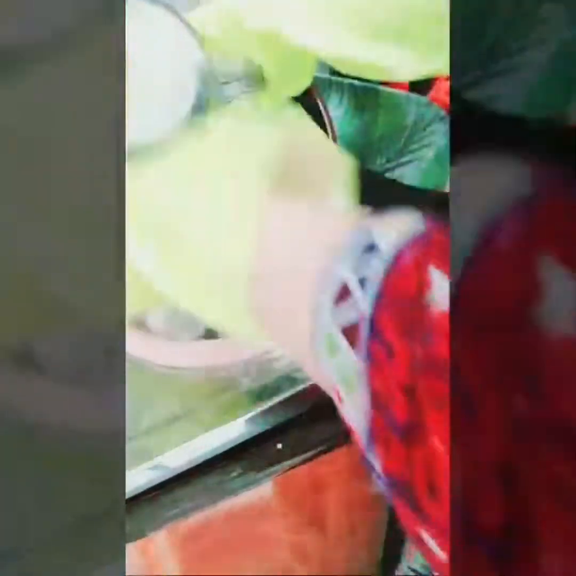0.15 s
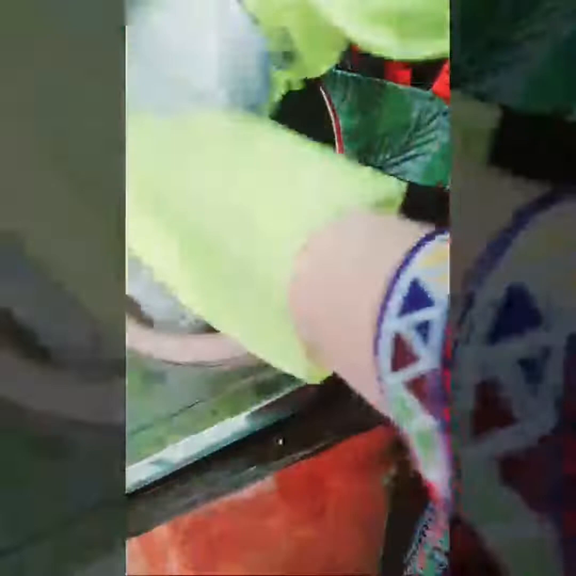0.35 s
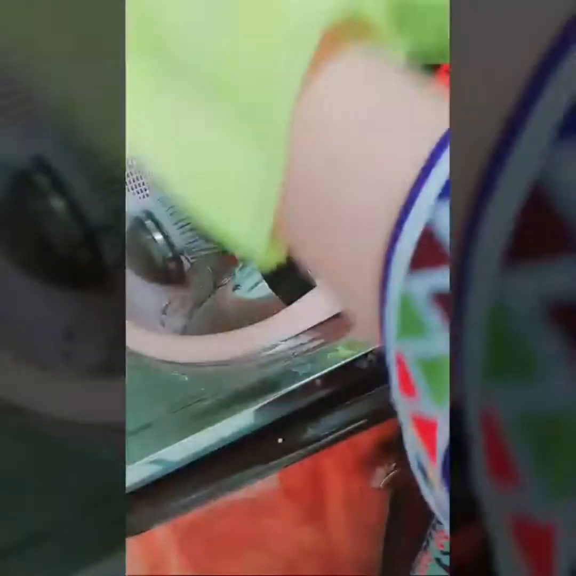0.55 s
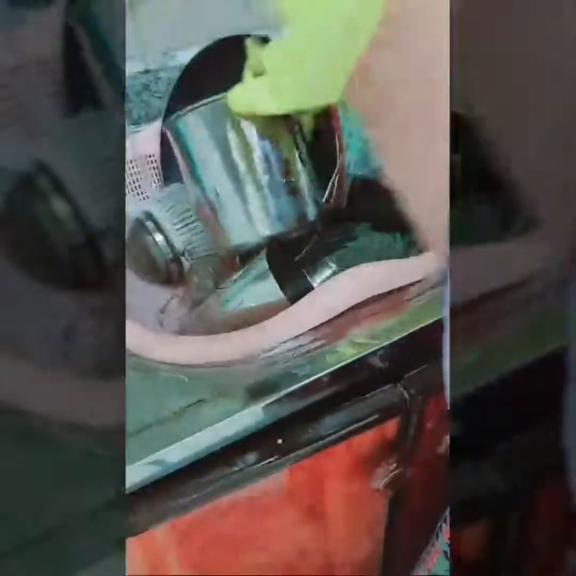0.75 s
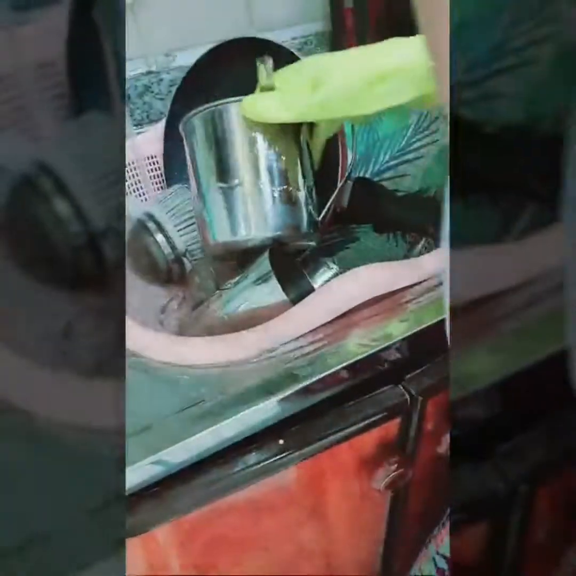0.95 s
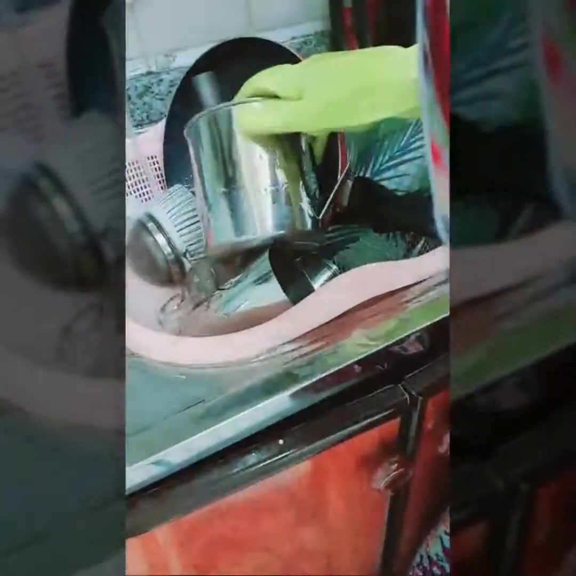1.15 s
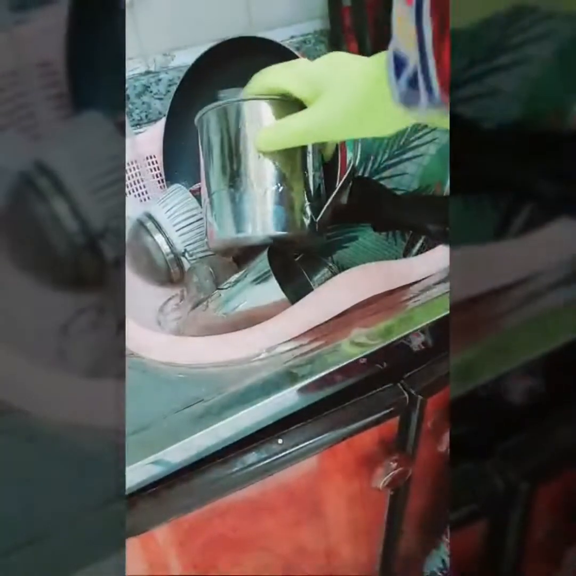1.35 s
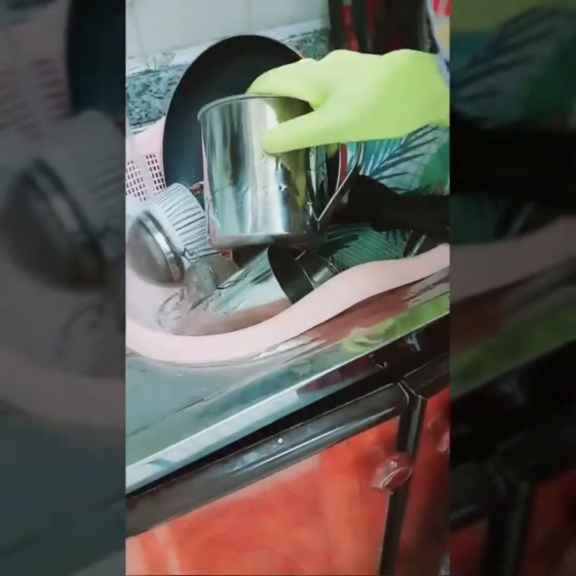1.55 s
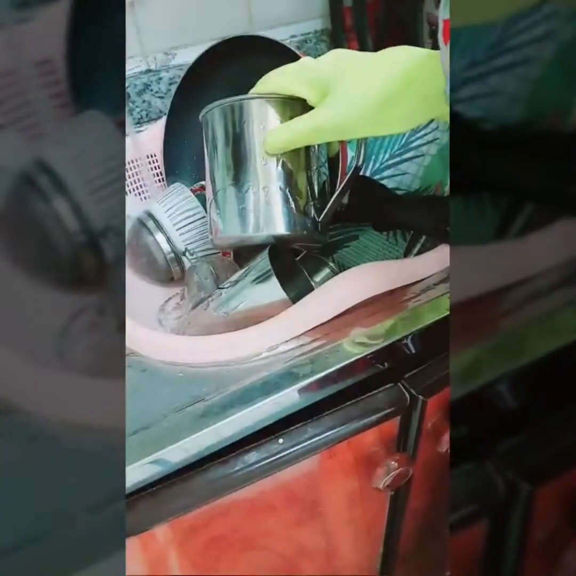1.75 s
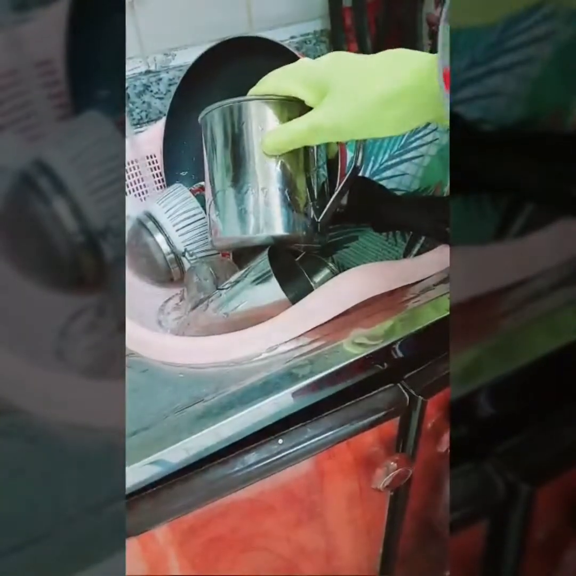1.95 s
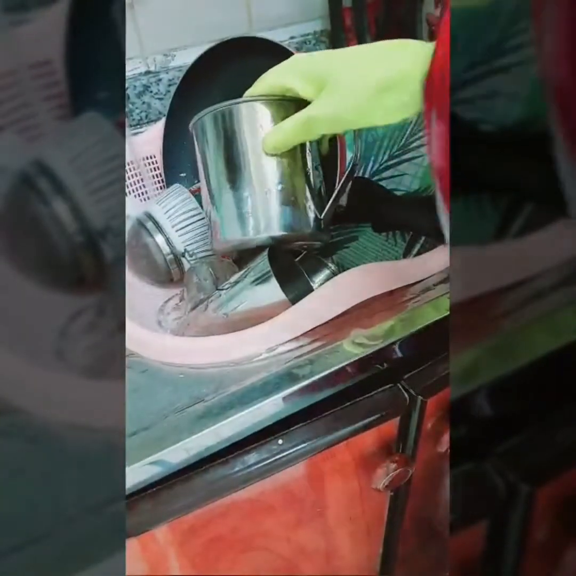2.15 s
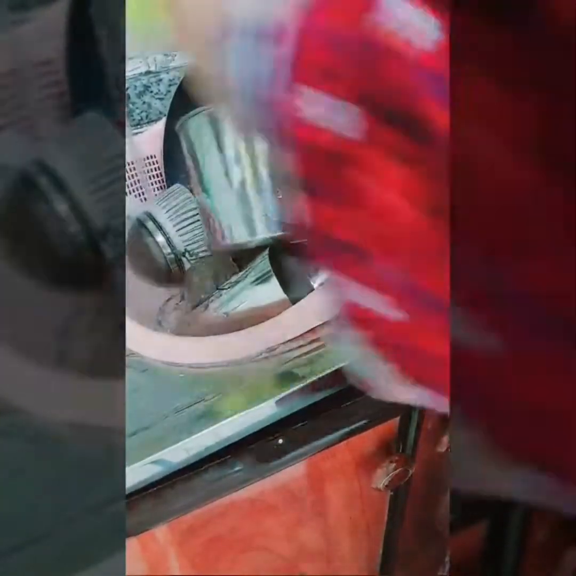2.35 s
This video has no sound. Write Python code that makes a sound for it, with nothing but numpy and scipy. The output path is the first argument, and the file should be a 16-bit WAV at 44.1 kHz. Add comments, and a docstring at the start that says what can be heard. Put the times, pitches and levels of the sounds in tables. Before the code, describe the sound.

Steel dishes clatter in a metal sink, close to a phone. Soft knocks from 0.1 seconds lead to the loudest, boomy clank at 0.4 with bright cup clinks; another bump and bowl clink follow at 0.6 to 0.7. After a lull, a mug scrapes and rings at 1.1 to 1.5. Duller knocks come at 1.6, 1.75 and 2.0 to 2.3, over faint room hum and hiss.

```python
"""A low room hum and hiss, then steel dishes bumping a steel sink, shifted by gloved hands near a phone.
Each bump booms in the basin's modes under a crowded knock and a clatter of ticks and hiss.
A mug drags over the pile: stick-slip clicks ring its walls and rasp on the steel.
A cup, a bowl and the mug clink as sums of dying modes.
The small kitchen answers with a tail of sparse taps; the hum and hiss are drifting shaped noise."""
import sys
import numpy as np
from scipy import signal
from scipy.fft import rfft, irfft, next_fast_len
from scipy.io import wavfile
from scipy.ndimage import uniform_filter1d

SR = 44100
rng = np.random.default_rng(int(sys.argv[2]) if len(sys.argv) > 2 else 0)


def pcm_store(signal):
    """Save signal as 16-bit PCM."""
    levels = np.round(np.clip(np.atleast_2d(signal), -1, 1) * 32767)
    wavfile.write(sys.argv[1], SR, levels.astype(np.int16).T)


def convert_level_to_amplitude(level_db):
    """Map a level in decibels to its linear amplitude factor."""
    exponent = np.asarray(level_db, float) / 20
    return 10 ** exponent


N = 103635  # length [samples]


def evened(x):
    """Scales to rms 1."""
    return x / np.sqrt(np.mean(x ** 2) + 1e-20)


def read(points, hz):
    """Reads a table on a log-frequency axis."""
    f, value = np.transpose(points)
    return np.interp(np.log(hz + 1), np.log(f + 1), value)


def add(mix, s, sound):
    """Adds a sound at time s, cut off where the mix ends."""
    part = mix[round(s * SR):][:len(sound)]
    part += sound[:len(part)]


def colour(x, points):
    """Gives noise or grains a spectrum, at rms 1."""
    size = next_fast_len(len(x))
    gain = convert_level_to_amplitude(read(points, np.fft.rfftfreq(size, 1 / SR)))
    return evened(irfft(rfft(x, size) * gain, size)[:len(x)])


def grains(per_s, spread_db):
    """Sparse clicks of random sign, a few of them large, at rms 1."""
    chance, size, sign = rng.random(N), rng.exponential(1, N), rng.choice([-1., 1.], N)
    return evened((chance < per_s / SR) * sign * convert_level_to_amplitude(spread_db * np.minimum(size, 4)))


def ring(modes, weights, rise_s):
    """One second of dying modes, swelling in with time constant rise_s."""
    t = np.arange(SR) / SR
    hz, db, t60 = np.transpose(modes)[:, :, None]
    tones = weights * convert_level_to_amplitude(db - 60 * t / t60) * np.sin(2 * np.pi * hz * t)
    return tones.sum(0) * (1 - np.exp(-t / rise_s))


def resonate(x, hz, width):
    """A fixed resonance, at rms 1."""
    r = np.exp(-np.pi * width / SR)
    return evened(signal.lfilter([1, 0, -1], [1, -2 * r * np.cos(2 * np.pi * hz / SR), r * r], x))


def crowd(points, t60, count):
    """Very many modes of random pitch and life around t60, shaped by a spectrum; energy 1."""
    lo, hi = np.log(points[1][0]), np.log(points[-1][0])
    place, size, life, turn = rng.random((count, 4)).T[:, :, None]
    hz, t = np.exp(lo + (hi - lo) * place ** .7), np.arange(SR // 4) / SR
    db = read(points, hz) + 5 * np.log10(hz) + 8 * size
    fade = convert_level_to_amplitude(db - 60 * t / (t60 * (0.14 + 1.54 * life)))
    body = (fade * np.sin(2 * np.pi * (hz * t + turn))).sum(0)
    return body / np.linalg.norm(body)


# dishes bumping the basin:
# (time [s], boom level [dB], knock level [dB], clatter level [dB], contact length [s])
BUMPS = [(0.125, -32.5, -11, -32, 0.066), (.205, -36, -3, -24.5, 0.012), (0.22, -29, -1.5, -32, 0.044),
         (0.305, -29.5, 2.5, -35.5, 0.049), (0.403, -8, 12, -13, 0.011), (0.436, -46, -7, -30, 0.041),
         (0.61, -19.5, 8, -19.5, 0.022), (0.675, -49, -14, -32, 0.031), (1.566, -29.5, -2, -61, 0.039),
         (1.752, -16.5, 5.5, -30.5, 0.017), (1.808, -51, -31, -41, 0.045), (2.009, -18, 5.5, -29, 0.017),
         (2.046, -20, 2.5, -42.5, 0.031), (2.124, -25.5, -13, -40.5, 0.013),
         (2.159, -28.5, -3, -36.5, 0.033), (2.198, -32, -5.5, -45, 0.013), (2.275, -49, -21, -42.5, 0.071)]
# low modes of the basin: (frequency [Hz], level [dB], t60 [s])
BASIN_MODES = [(81, 2, 0.17), (120, 7, 0.077), (160.3, 3.5, 0.051), (262.3, -10, 0.34)]
# crowded upper modes of the basin: (frequency [Hz], level per Hz [dB])
KNOCK_SPECTRUM = [(150, -29), (280, -1), (520, -1.5), (1050, -11), (2270, -18), (4500, -54)]


def basin():
    """Each bump is a first blow and smaller jolts while contact lasts; chance sets how each mode answers."""
    knock_t60, rise_s, jolts_per_s = 0.088, 0.003, 120  # typical t60 and mean rate
    out, t = np.zeros(N), np.arange(SR // 4) / SR
    chances = rng.random((len(BUMPS), 3, 8))
    for (s, boom_db, knock_db, _, length), (when, size, share) in zip(BUMPS, chances):
        weights = 0.84 + 0.15 * share[:len(BASIN_MODES), None]
        blow = convert_level_to_amplitude(boom_db) * ring(BASIN_MODES, weights, rise_s)[:SR // 2]
        knock = crowd(KNOCK_SPECTRUM, knock_t60, count=160)
        add(blow, 0, convert_level_to_amplitude(knock_db) * knock * np.minimum(t / rise_s, 1))
        at = np.r_[0, np.cumsum((.6 + .8 * when) / jolts_per_s)]
        touching = at[1:] < length
        sign = (-1) ** (when > .5)
        jolts = np.zeros(SR // 8)
        jolts[(at * SR).astype(int)] = np.r_[1, (.4 + .3 * size) * touching * sign]
        add(out, s, signal.oaconvolve(blow, jolts))
    return out


# clatter of the pile: (frequency [Hz], level per Hz [dB])
CLATTER_SPECTRUM = [(150, -58), (400, -2), (3970, -4), (7600, -9.5), (8900, -20), (10500, -18),
                    (12100, -10.5), (13200, -34)]
PILE_T60 = 0.12  # typical ring of the pile [s]


def clatter():
    """While contact lasts, ticks ring the many modes of the pile over a short hiss."""
    ticks_per_s, rise_s, fall_t60, hiss_share = 1000, 0.0016, 0.046, 0.84
    out, t = np.zeros(N), np.arange(SR // 4) / SR
    ticks = grains(ticks_per_s, 5.6)
    hiss = colour(rng.standard_normal(N), CLATTER_SPECTRUM)
    for s, _, _, db, length in BUMPS:
        at = round(s * SR)
        fall = convert_level_to_amplitude(db - 60 * np.maximum(t - length, 0) / fall_t60)
        level = (fall * np.minimum(t / rise_s, 1))[:N - at]
        part = slice(at, at + len(level))
        burst = level * ticks[part]
        burst = np.linalg.norm(level) * burst / np.linalg.norm(burst)  # energy free of the tick count
        add(out, s, signal.oaconvolve(burst, crowd(CLATTER_SPECTRUM, PILE_T60, count=80)))
        add(out, s, hiss_share * level * hiss[part])
    return out


# modes of the mug, the first its low hum: (frequency [Hz], width [Hz], level [dB])
MUG_MODES = [(519.1, 13.5, 0), (1658, 14, -6.5), (2433, 22, -7), (2784, 56, -6.5), (3300, 57, -2),
             (5080, 24, -5), (5470, 60, -4), (7210, 50, -3)]
# path of the drag: (time [s], scrape level [dB], mug wall hum level [dB])
DRAG_PATH = [(1.123, -34.5, -51), (1.184, -32, -32), (1.195, -16.5, -37.5), (1.249, -23, -24),
             (1.28, -27.5, -46), (1.308, -23.5, -23), (1.335, -30.5, -31.5), (1.351, -26.5, -18),
             (1.372, -27.5, -32.5), (1.387, -21.5, -24), (1.432, -25, -47), (1.475, -49, -50),
             (1.754, -39.5, -38)]
# rasp on the steel: (frequency [Hz], level per Hz [dB])
SCRAPE_SPECTRUM = [(410, -39), (700, -19.5), (1690, -11.5), (2240, -16), (3460, -2.5), (13500, -23)]


def drag():
    """Stick-slip clicks ring the mug's walls and rasp on the steel; as the contact slides, other modes answer."""
    slips_per_s, ring_db, rasp_db = 1200, -12.5, -5.5
    flicker_db, flicker_s = 4.5, 0.02  # each mode swells and fades as the contact slides
    s, scrape_db, hum_db = np.transpose(DRAG_PATH)
    t = np.arange(N) / SR
    on = np.clip(np.minimum(t - s[0], s[-1] - t) / 0.0044, 0, 1)
    slips = grains(slips_per_s, 2.67) + 0.44 * rng.standard_normal(N)

    span = round(flicker_s * SR)
    drift = rng.standard_normal((len(MUG_MODES) + 2, N))
    flicker = evened(uniform_filter1d(uniform_filter1d(drift, span), span))
    walls = sum(convert_level_to_amplitude(db + flicker_db * f) * resonate(slips, hz, width)
                for f, (hz, width, db) in zip(flicker, MUG_MODES[1:]))
    pile = sum(signal.oaconvolve(convert_level_to_amplitude(flicker_db * f) * evened(slips),
                                 crowd(SCRAPE_SPECTRUM, PILE_T60, count=50))[:N]
               for f in flicker[-3:]) / 2
    rasp = colour(slips, SCRAPE_SPECTRUM) + pile
    scrape = convert_level_to_amplitude(ring_db) * walls + convert_level_to_amplitude(rasp_db) * rasp

    wall_hum = resonate(slips, *MUG_MODES[0][:2])
    wall_hum /= np.sqrt(uniform_filter1d(wall_hum ** 2, 900) + 0.6)  # evens out its swells
    scrape_level = convert_level_to_amplitude(np.interp(t, s, scrape_db))
    hum_level = convert_level_to_amplitude(np.interp(t, s, hum_db))
    return on * (scrape_level * scrape + hum_level * wall_hum)


# modes of the cup and of the bowl: (frequency [Hz], level [dB], t60 [s])
CUP_MODES = [(2543, -8, 0.16), (2820, -1, 0.23), (3002, 9.5, 0.17), (4540, -9, 0.98), (4858, 12.5, 0.068),
             (5502, 0, 0.13), (7289, 2, 0.25), (7610, 12, 0.089)]
BOWL_MODES = [(1390, -11.5, 4.2), (2406, -3, 0.21), (2951, -3.5, 0.43), (3300, -4, 0.39), (3905, -9, 0.51),
              (4090, -11, .19), (4860, 0, 0.22), (4890, 5.5, 0.17), (5430, 12, 0.14), (5900, 4, 0.2),
              (6300, -1, 0.12), (7170, 20.5, 0.067), (7580, 13.5, 0.16)]
# clinks of cup and bowl, catches of the mug:
# (time [s], level [dB], favoured pitch [Hz], range [octaves])
CUP_CLINKS = [(0.21, -32.5, 4400, 0.54), (.407, -23, 5540, 0.79), (.417, -16.5, 3300, 1.26)]
BOWL_CLINKS = [(0.615, -33, 3000, 3.6), (0.624, -28, 4970, 1.8), (0.683, -22.5, 3905, 0.057)]
MUG_CATCHES = [(1.19, -19, 2920, 2.1), (1.212, -33, 6000, 0.74), (1.388, -8, 3300, 0.13)]


def clinks():
    """Cup, bowl and mug ring in their own modes; where a blow lands favours a range of them."""
    rise_s, cup_stop_s, stop_t60 = 0.003, 0.49, 0.06
    cup, bowl, mug = np.zeros((3, N))
    # a mode's width sets how long it rings
    walls = [(hz, db, np.log(1000) / np.pi / width) for hz, width, db in MUG_MODES[1:]]
    dishes = ((cup, CUP_MODES, CUP_CLINKS), (bowl, BOWL_MODES, BOWL_CLINKS), (mug, walls, MUG_CATCHES))
    for out, modes, rows in dishes:
        for s, db, hz, octaves in rows:
            distance = np.log2(np.array(modes)[:, :1] / hz)
            favour = np.exp(-(distance / octaves) ** 2)
            add(out, s, convert_level_to_amplitude(db) * ring(modes, favour, rise_s))
    # a hand stops the cup
    stop = convert_level_to_amplitude(-60 * np.maximum(np.arange(N) / SR - cup_stop_s, 0) / stop_t60)
    return cup * stop + bowl + mug


# room hum and hiss: (frequency [Hz], level per Hz [dB])
HUM_SPECTRUM = [(45, -4), (70, -2.5), (102, 3), (135, -15), (700, -13.5), (1900, -20.5), (2500, -11.5),
                (7800, -15.5), (9000, -31), (12300, -21.5), (13600, -39)]
# left-right likeness of the hum and hiss: (frequency [Hz], likeness [0 to 1])
HUM_LIKENESS = [(60, 1), (890, 0.4), (13100, 0)]


def hum():
    """Room hum and hiss: shaped stereo noise with drifting patches, less alike in the treble."""
    hum_db, patch_db = -39, 3.7  # overall rms; rms swing of the patches
    frames, hz = N // 512 + 5, np.fft.rfftfreq(2048, 1 / SR)
    a, b, c, d, patches = rng.standard_normal((frames, 1025, 5)).T
    patches = evened(uniform_filter1d(uniform_filter1d(patches, 12, 0), 10, 1))
    same = np.clip(read(HUM_LIKENESS, hz), -1, 1)[:, None]
    left, other = a + 1j * b, c + 1j * d
    z = np.array([left, same * left + np.sqrt(1 - same ** 2) * other])
    z *= convert_level_to_amplitude(read(HUM_SPECTRUM, hz)[:, None] + patch_db * patches)
    return convert_level_to_amplitude(hum_db) * evened(signal.istft(z, nperseg=2048, noverlap=1536)[1][:, :N])


# decay of the kitchen: (frequency [Hz], t60 [s])
ROOM_DECAY = [(100, 0.71), (2000, 0.35), (12000, 0.28)]


def room(x):
    """Sparse taps of random sign, each band dying at its own speed; the bass is alike in both ports."""
    taps = np.zeros((2, SR // 2))
    slots = np.arange(200, SR // 2 - 20, 20)
    at = slots + rng.integers(0, 20, (2, len(slots)))
    np.put_along_axis(taps, at, rng.choice([-1., 1.], at.shape), 1)
    hz, t, z = signal.stft(taps, SR, nperseg=256)
    fade = convert_level_to_amplitude(-60 * t / read(ROOM_DECAY, hz)[:, None])
    tail = signal.istft(z * fade, SR, nperseg=256)[1]
    apart = np.clip(np.fft.rfftfreq(tail.shape[1], 1 / SR) / 700, 0, 1)
    spec = rfft(tail)
    spec[1] = apart * spec[1] + np.sqrt(1 - apart ** 2) * spec[0]
    tail = irfft(spec, tail.shape[1])
    return signal.fftconvolve(x[None], tail / np.linalg.norm(tail[0]), axes=1)[:, :N]


def ports(x, scatter, lead_s=0):
    """Path difference and reflections off the steel give the two microphone ports treble phases of their own."""
    wide_hz, left_db = 1055, 0.5  # phases part fully above wide_hz; left is louder by left_db
    size = next_fast_len(N + 4096)
    hz = np.fft.rfftfreq(size, 1 / SR)
    knots = np.arange(0, SR / 2 + 300, 300)
    wander = np.interp(hz, knots, rng.uniform(-1.925, 1, len(knots)))
    lead = scatter * wander * np.minimum(hz / wide_hz, 1) ** 2
    half = convert_level_to_amplitude(left_db / 2) * np.exp(1j * (lead + np.pi * hz * lead_s))  # half the difference to each port
    return irfft(rfft(x, size) * np.array([half, 1 / half]), size)[:, :N]


def scene():
    """All dishes, their room and the hum."""
    scatter, clink_lead_s, room_db = 1.29, 4e-5, -9.5  # the left port hears the clinks first
    parts, rings = [basin(), clatter(), drag()], clinks()
    direct = sum(ports(p, scatter) for p in parts) + ports(rings, 0, clink_lead_s)
    return direct + convert_level_to_amplitude(room_db) * room(sum(parts) + 0.72 * rings) + hum()


def band_limit(x):
    """A steep low-pass at the top of the band."""
    return signal.sosfilt(signal.butter(12, 13730, fs=SR, output="sos"), x)


def record(dry):
    """The microphone cuts the deep bass and rounds off the loudest peaks."""
    low_cut = signal.butter(5, 64.6, "high", fs=SR, output="sos")  # [Hz]
    cut = signal.sosfilt(low_cut, dry)
    mix = 0.88 * np.tanh(cut / 0.92)
    return band_limit(mix)


dry = scene()
out = record(dry)
pcm_store(out)
```